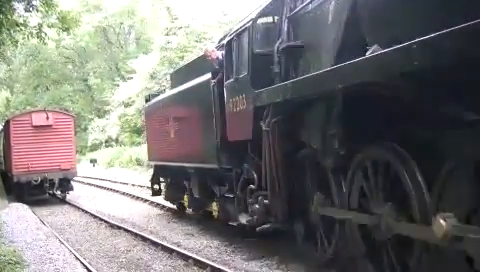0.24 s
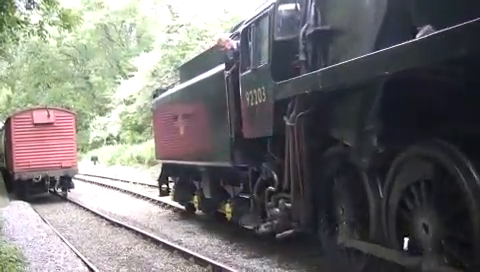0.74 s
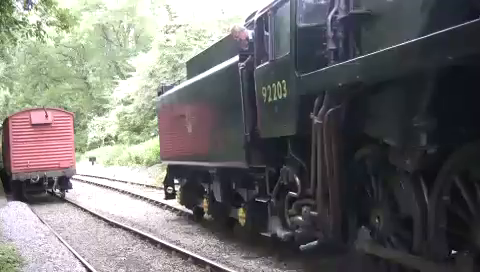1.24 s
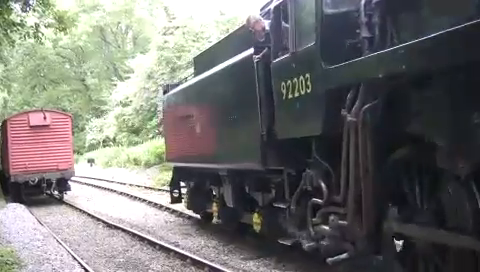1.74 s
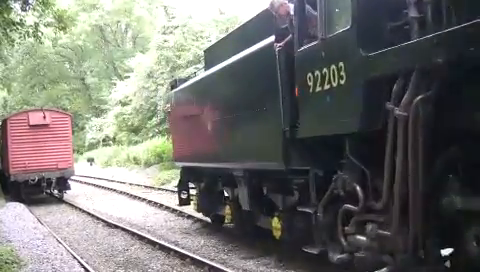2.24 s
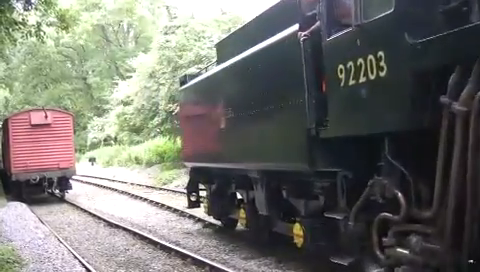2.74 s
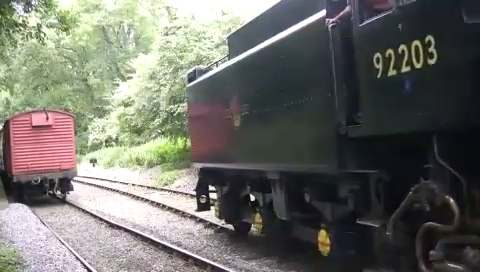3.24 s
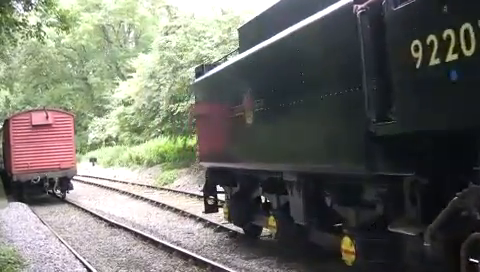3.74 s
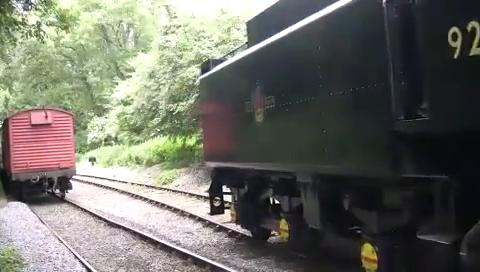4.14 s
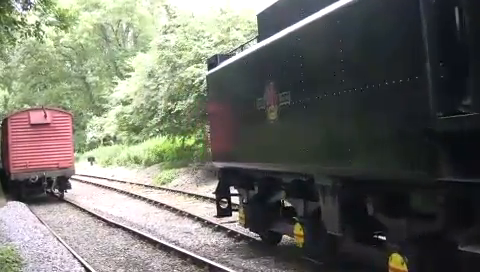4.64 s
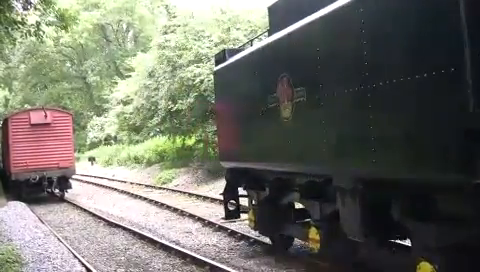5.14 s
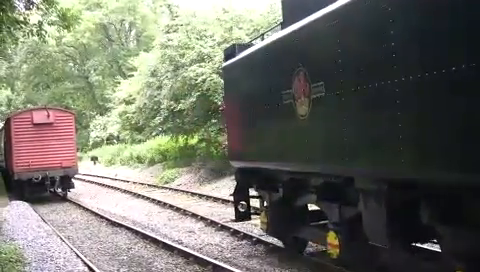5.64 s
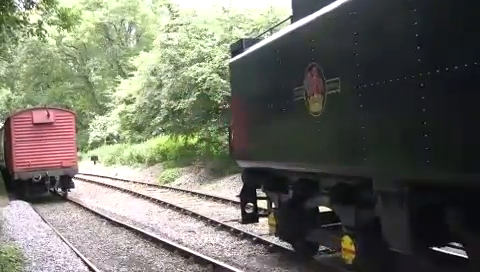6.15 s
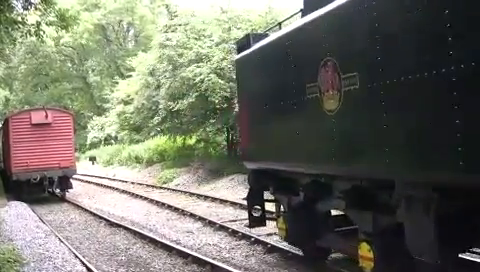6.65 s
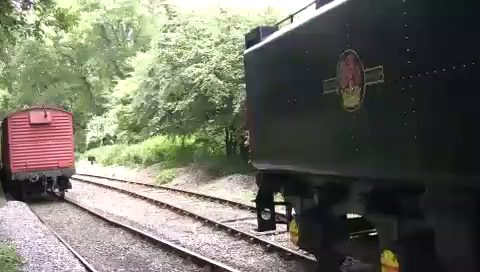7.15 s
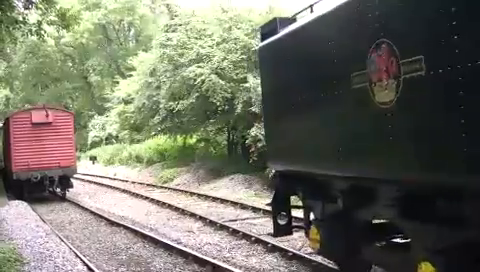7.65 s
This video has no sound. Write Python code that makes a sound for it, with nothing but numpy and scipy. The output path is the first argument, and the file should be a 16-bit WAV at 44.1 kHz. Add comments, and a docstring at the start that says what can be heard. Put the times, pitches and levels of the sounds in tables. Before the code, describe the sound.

Close trackside stereo pickup of a slow heavy engine venting steam. Dense hissing starts at once and shifts in colour, with swelling rumble and low draught on the microphone. After brief faint squeaks, a burst of knocks and stick-slip steel groaning arrives midway. The draught fades, the steam softens but continues, and scattered hollow clanks finish with a faint buffer ring.

```python
"""A steam locomotive rolls slowly past at close range.
From the start a jet of steam hisses under the cab: banded noise that flutters and turns in colour,
over wheel rumble that swells now and then until just past five seconds.
Faint gliding squeaks come first, while the jet's draught builds up as low noise buffeting the microphone.
Midway the drawgear knocks and judders: clicks and stick-slip pulses ring the damped modes of a steel frame.
The draught dies away, the hiss recedes, and the tender clanks as it draws level, its buffer ringing on."""
import sys
import numpy as np
from scipy import signal
from scipy.fft import irfft, next_fast_len
from scipy.io import wavfile
from scipy.ndimage import uniform_filter1d

SR = 44100
rng = np.random.default_rng(int(sys.argv[2]) if len(sys.argv) > 2 else 0)


def transcribe(u):
    """Save the signal u as a 16-bit wav file named by the first command-line argument.

    u: samples, shape (n,) or (channels, n), limited to [-1, 1]; the rate is SR.
    q: integer samples, one column per channel.
    """
    v = np.clip(np.atleast_2d(u).T, -1, 1)
    q = np.round(v * 32767).astype(np.int16)
    wavfile.write(sys.argv[1], SR, q)


N = 347497
TIME = np.arange(N) / SR   # seconds

# The steam jet comes near, then moves away; the jet's gain is added: time_s, level_db
JET_LEVEL = [(0.0, -12), (0.39, -13), (0.53, -14), (0.77, -12.5), (1.12, -13), (1.31, -11.5), (2.63, -13.5),
             (2.9, -11), (3.05, -12.5), (4.91, -14), (6.04, -18), (6.82, -16.5), (7.09, -18), (7.88, -17)]
# The jet's colour as it turns past, against its core: time_s, roar_db, pipe_band_db, top_db
JET_COLOUR = [(0, 3, -.5, 2), (1.35, 1.2, 2, 4), (2.3, 0.2, 0.2, 0), (3.4, -2, -2, -2.5),
              (5.0, -2.5, -2.5, -2), (6.5, 2, 0.3, 1.5), (7.88, 1, 0.5, 0)]
# Centres of the colour zones: core_hz, roar_hz, pipe_band_low_hz, pipe_band_high_hz, top_hz
COLOUR_CENTRES = (7200, 2120, 4170, 5460, 13000)
# The pipe band's lower edge climbs and sinks again, its firmness coming and going:
# time_s, edge_hz, firmness_db
PIPE_EDGE = [(0.3, 3170, 2), (0.9, 3470, 1.8), (1.4, 3600, 3), (2.1, 3700, 0), (2.8, 3580, 1.5),
             (5.5, 3320, 0.7)]
# Steam spectrum: frequency_hz, density_db (per Hz)
STEAM_SPECTRUM = [(50, -54), (400, -18.5), (1000, -13), (2400, -9), (3100, -6), (3900, -3), (5200, 0.7),
                  (5850, -3), (6600, -2), (7100, -1.2), (8700, 0.5), (11500, -2.5), (13500, -5.5),
                  (16000, -10.5)]
# The hiss's top leans right, less so later: time_s, top_left_minus_right_db
TOP_PAN = [(4.9, -3.5), (6.0, -1.5)]
# Draught spectrum: frequency_hz, density_db (per Hz)
DRAUGHT_SPECTRUM = [(20, -40), (50, -27), (80, -23), (120, -3.5), (180, -4.5), (300, 5.5), (450, 0),
                    (700, 1.5), (1000, -1.5), (2000, -9.5), (4000, -47)]

# Drawgear knocks and their rebounds; the last three stand against the body:
# start_s, body_db, clack_db, frame_ring_db, crack_db
KNOCKS = [(3.286, -20, -11, -14, -18), (3.342, -18, -14, -19, -20), (3.365, -22, -11, -18, -18),
          (3.447, -19, -7, -15, -6), (3.498, -24.5, -3, -10, -17), (3.550, -25, -5, -14, -3),
          (3.597, -29, -3, -14, -12), (3.630, -23.5, -1, -8, -12), (3.703, -26, -3, 8.5, -8),
          (3.751, -28, -8, -3, -12), (4.146, -22.5, -24, -20, -14), (4.167, -28, -6, -18, -14),
          (4.193, -29, -12, -14, -16), (6.174, -27.5, -1.5, -15, 0), (6.192, -29, -6, -15, -6),
          (6.251, -37.5, 5, -13, 6), (6.283, -30, -12, -4, -12), (6.542, -24, -9, -16, -6),
          (6.565, -28, -6, -14, 5), (6.619, -25, -9, -11, -4), (6.643, -31, -10, -10, -10),
          (6.681, -22, -16, -10, -20), (6.700, -26, -13, 1, -6), (6.732, -28, -10, -10, -9),
          (6.79, -24.5, -23, 2, -16), (6.996, -19.5, -5.5, -27, -5), (7.061, -22, -9, -19, -12),
          (7.086, -24.5, -6, -19, -8), (7.149, -26.5, -6, -22, -11), (7.172, -28, -5, -16, -13),
          (7.551, -21, -5.5, -8, -11), (7.575, -25, -5, -15, -10), (7.628, -25, -9, 0, -13),
          (7.706, -26, -10, -1, -15)]
# The buffer is touched and rings on: start_s, level_db
BUFFER_HITS = [(6.996, -37), (7.086, -33), (7.551, -39)]
# Stick-slip judder of the loaded drawgear; the last two stand against the body:
# time_s, level_db, slips_per_s, clack_db, ring_db
JUDDER = [(3.29, -26.5, 45, -13, -6), (3.41, -25, 45, -10, -3), (3.49, -26, 50, -6, -7),
          (3.579, -18.5, 80, -10, 0), (3.66, -23, 89, 1, -3), (3.731, -18.5, 110, 1, 3),
          (3.77, -21.5, 95, -1, 4), (3.81, -25, 75, -4, -5), (3.88, -19.5, 70, -6, -1),
          (3.92, -21, 62, -8, -10), (3.97, -24, 60, -8, -16), (4.001, -37, 50, -8, -14)]
# Damped modes of the tender's frame: pitch_hz, level_db, t60_s
FRAME_MODES = [(157.6, -8.5, 0.088), (243.4, 4.5, 0.091), (290.4, -3.5, 0.1), (354, 7.5, 0.031),
               (440, 0.5, 0.079), (500, 6.5, 0.026), (549, 1, 0.033), (643, 3.5, 0.023), (741, -3, 0.041),
               (802, 0, 0.018), (1120, -10, 0.027), (1240, -9.5, 0.025)]
# Borders of boom, body and clack: low_hz, high_hz
REGISTERS = [(120, 280), (280, 580), (580, 1300)]
# Lasting rings, frame first and buffer second: pitch_hz, t60_s
LASTING_RINGS = [(441, 0.29), (937, 0.85)]
# Faint squeaks of the motion: start_s, length_s, start_hz, end_hz, level_db
SQUEAKS = [(0.163, 0.062, 1554, 1400, -24), (0.396, 0.069, 1780, 1505, -23),
           (0.528, 0.085, 1450, 1560, -27)]

# Rolling gear and fire, before the swells: time_s, level_db
ROLLING_LEVEL = [(0, -38.5), (0.7, -33.5), (1.35, -38.5), (2.0, -36), (3.1, -36), (4.2, -34), (4.5, -34.5),
                 (5.6, -34.7), (6.5, -36), (7.88, -36.5)]
# Rumble spectrum: frequency_hz, density_db (per Hz)
RUMBLE_SPECTRUM = [(20, -38), (45, -28), (75, -14), (110, -10), (160, 0.5), (240, 1), (450, -2.5),
                   (650, -9), (1000, -26), (2000, -21)]
# The rumble swells as rods and wheels load the rails: centre_s, half_length_s, rise_db
SWELLS = [(0.384, 0.24, 3.5), (0.95, 0.22, 6.5), (1.63, 0.11, 9), (2.246, 0.15, 6), (2.527, 0.17, 5.5),
          (2.878, 0.049, 5), (4.892, 0.1, 7), (5.223, 0.028, 7)]

# Likeness of left and right noise: frequency_hz, likeness (0-1)
LIKENESS = [(30, 0.49), (120, 1), (270, 1), (600, 1), (1200, 0.88), (2600, 0.98), (3600, 1), (5000, 0.64),
            (5750, 0.28), (6200, 0.77), (6700, 0.45), (7050, 0.99), (16000, 0.99)]
# Balance of left and right noise: frequency_hz, left_minus_right_db
STEREO_BALANCE = [(100, 0.5), (300, 0.5), (700, -0.5), (1100, -1), (2500, -0.5), (3700, 0), (5250, 3.5),
                  (6000, -0.5), (7200, 0), (16000, 0.5)]
# Phase between left and right: frequency_hz, left_lead_rad
STEREO_PHASE = [(100, 0.0025), (1000, -0.42), (2700, -0.15), (3500, -0.89), (4300, -0.098), (5000, -1.15),
                (5400, -1.53), (5750, -1.4), (6200, -1.3), (6700, -1.45), (7000, 0), (16000, 0)]

# The draught builds up, holds until the jet has passed, then dies away
DRAUGHT_DB, DRAUGHT_RISE_DB_PER_S, DRAUGHT_FULL_S = -33, 4.5, 0.94
DRAUGHT_ENDS_S, DRAUGHT_FADE_DB_PER_S = 4.15, 11.5
BOOM_DB = -5   # a knock's boom against its body
THUD_HZ, THUD_T60_S, THUD_DB = 98, 0.15, -18   # the tender rocks on its springs; against the body
DRAWBAR_HZ, DRAWBAR_T60_S, DRAWBAR_DB = 508, 0.15, -2.5   # in the judder; against the frame's ring
# The judder's boom at its start, against the body; it thins as the drawgear tightens
JUDDER_BOOM_DB, BOOM_FADE_DB_PER_S = 1, 16
CUTOFF_HZ = 15900


def from_db(db):
    """Decibels to gain."""
    return 10 ** (np.asarray(db) / 20)


def rms_one(x):
    """Scale to rms 1."""
    return x / np.sqrt(np.mean(x ** 2) + 1e-20)


def in_time(rows):
    """Each column of a time curve, read at every sample."""
    s, *columns = np.transpose(rows)
    return [np.interp(TIME, s, column) for column in columns]


def at_hz(points, hz):
    """Read a curve on a log-frequency axis."""
    f, value = np.transpose(sorted(points))
    return np.interp(np.log(hz), np.log(f), value)


def drift(rate_hz):
    """Slow random wander of spread 1: noise through two equal low-pass poles, computed every 40 samples."""
    r = np.exp(-2 * np.pi * rate_hz * 40 / SR)
    noise = rng.standard_normal(N // 40 + 2002)
    slow = signal.lfilter([1], [1, -2 * r, r * r], noise)[2000:]   # drop the filter's start-up
    return np.interp(np.arange(N) / 40, np.arange(len(slow)), rms_one(slow))


def ring(force, hz, t60_s):
    """A damped resonance: a unit click sets a sine of height 1 ringing."""
    r = np.exp(-np.log(1000) / (t60_s * SR))
    w = 2 * np.pi * hz / SR
    return signal.lfilter([0, np.sin(w)], [1, -2 * r * np.cos(w), r * r], force + 1e-18)


def noise_bands(spectrum, low_hz, high_hz, count, likeness=LIKENESS):
    """Stereo noise with set likeness, balance and phase, in overlapping bands: yields (centre Hz, band)."""
    size = next_fast_len(N, real=True)
    hz = np.maximum(np.arange(size // 2 + 1) * SR / size, 1)
    mid, side = rng.standard_normal((2, len(hz))) + 1j * rng.standard_normal((2, len(hz)))
    alike = np.clip(at_hz(likeness, hz), 0, 1)
    sides = np.array([[1], [-1]])   # left, right
    balance = from_db(sides * at_hz(STEREO_BALANCE, hz) / 2)
    phase = np.exp(.5j * sides * at_hz(STEREO_PHASE, hz))
    noise = np.sqrt(1 + alike) * mid + sides * np.sqrt(1 - alike) * side
    noise = noise * balance * phase * from_db(at_hz(spectrum, hz))
    centres = np.geomspace(low_hz, high_hz, count)
    for centre, share in zip(centres, np.eye(count)):
        band = noise * np.interp(np.log(hz), np.log(centres), share)
        yield centre, irfft(band.astype(np.complex64), size)[:, :N]


def steam(gain_db=1., flutter_db=0.47, patchy_db=0.94, pipe_patchy_db=1.48, flutter_hz=16, patchy_hz=14,
          pan_range_hz=(7500, 10500), edge_octaves=0.12):
    """Turbulent jet: flutters as a whole and in patches, most in the pipe band, and turns in colour."""
    level_db, = in_time(JET_LEVEL)
    roar_db, pipe_db, top_db = in_time(JET_COLOUR)
    edge_hz, edge_db = in_time(PIPE_EDGE)
    pan_db, = in_time(TOP_PAN)
    zones = np.eye(len(COLOUR_CENTRES))[1:]   # the core stays uncoloured
    out = 0
    for hz, band in noise_bands(STEAM_SPECTRUM, 1530, 12920, count=27):
        roar, pipe_low, pipe_high, top = (at_hz(list(zip(COLOUR_CENTRES, zone)), hz) for zone in zones)
        pipe = pipe_low + pipe_high
        # a hollow just below the pipe band's edge, a ridge just above it
        above = np.log2(hz / edge_hz) / edge_octaves
        ridge_db = edge_db * above * np.exp((1 - above ** 2) / 2)
        colour_db = roar * roar_db + pipe * pipe_db + top * top_db + ridge_db
        patch_db = (pipe * pipe_patchy_db + (1 - pipe) * patchy_db) * drift(patchy_hz)
        # only the top of the hiss is panned
        pan = from_db(np.interp(hz, pan_range_hz, [0, 1]) * pan_db / 2)
        out = out + band * np.array([pan, 1 / pan]) * from_db(colour_db + patch_db)
    # level out half-second swings, so the level curve alone sets them
    steady = out / np.sqrt(uniform_filter1d(np.mean(out ** 2, axis=0), size=SR // 2))
    return steady * from_db(level_db + gain_db + flutter_db * drift(flutter_hz))


def draught(gusty_db=3, gust_hz=12):
    """Eddies of moving air buffet left and right with unrelated noise; no gust stands far out."""
    before_s = np.maximum(DRAUGHT_FULL_S - TIME, 0)
    after_s = np.maximum(TIME - DRAUGHT_ENDS_S, 0)
    level_db = DRAUGHT_DB - DRAUGHT_RISE_DB_PER_S * before_s - DRAUGHT_FADE_DB_PER_S * after_s
    out = 0
    for _, band in noise_bands(DRAUGHT_SPECTRUM, 86, 800, count=3, likeness=[(1, 0)]):
        out = out + band * from_db(gusty_db * np.tanh(drift(gust_hz)))
    return rms_one(out) * from_db(level_db)


def frame(force, low_hz, high_hz, scatter_db=5.0, detune=0.0097):
    """The frame's damped modes in one register; strength and pitch of each vary with the contact."""
    strengths, shifts = rng.standard_normal((2, len(FRAME_MODES)))
    modes = 0
    for k, (hz, db, t60_s) in enumerate(FRAME_MODES):
        if low_hz < hz < high_hz:
            mode = ring(force, hz * (1 + detune * shifts[k]), t60_s)
            modes = modes + (-1) ** k * mode * from_db(db + scatter_db * strengths[k])
    return signal.sosfilt(signal.butter(1, [low_hz, high_hz], "band", fs=SR, output="sos"), modes)


def knocks(rattle_db=-34, rattle_follows=0.42, rattle_s=0.059, crack_s=0.014, crack_hz=(900, 2100)):
    """Slack is taken up: a blow rings the frame with a crack of steel; stronger clacks rattle more."""
    t = np.arange(SR // 4) / SR
    attack = t < .018
    click = (t == 0) * 1.
    crack_band = signal.butter(2, crack_hz, "band", fs=SR, output="sos")
    out = np.zeros(N + len(t))
    for s, body_db, clack_db, _, crack_db in KNOCKS:
        rattle = rng.standard_normal(len(t)) * np.exp(-t / rattle_s)
        force = click + from_db(rattle_db + rattle_follows * clack_db) * rattle
        crack = rms_one(signal.sosfilt(crack_band, rng.standard_normal(len(t))))
        knock = from_db(crack_db) * crack * np.exp(-t / crack_s)
        knock = knock + from_db(THUD_DB) * ring(force, THUD_HZ, THUD_T60_S)
        for db, (low_hz, high_hz) in zip((BOOM_DB, 0, clack_db), REGISTERS):
            part = frame(force, low_hz, high_hz)
            # each register is scaled by its level during the attack
            knock = knock + from_db(db) * part / np.std(part[attack])
        at = round(s * SR)
        out[at:at + len(t)] += from_db(body_db) * knock
    return out[:N]


def ringing(waver=0.01105, waver_hz=25.6):
    """Blows add energy to lightly damped rings of frame and buffer, which waver in pitch as they drain."""
    frame_hits = [(s, body_db + ring_db) for s, body_db, _, ring_db, _ in KNOCKS]
    out = np.zeros(N)
    for (hz, t60_s), hits in zip(LASTING_RINGS, (frame_hits, BUFFER_HITS)):
        s, db = np.transpose(hits)
        fed = np.zeros(N)
        fed[np.round(s * SR).astype(int)] = from_db(db) ** 2
        kept = np.exp(-2 * np.log(1000) / (t60_s * SR))   # share of energy left after one sample
        energy = uniform_filter1d(signal.lfilter([1], [1, -kept], fed + 1e-18), size=128)
        turns = np.cumsum(hz * (1 + waver * drift(waver_hz))) / SR
        out += np.sqrt(2 * np.abs(energy)) * np.sin(2 * np.pi * turns)
    return out


def judder(uneven=0.32, sway_db=2, sway_hz=9, grit_db=-34, scatter_db=4.6, soft_hz=950, slip_spread_db=2.2):
    """The drawgear sticks and slips unevenly; under load the slips crowd into a gritty, brighter rasp."""
    level_db, slips_per_s, clack_db, ring_db = in_time(JUDDER)
    start_s, end_s = JUDDER[0][0], JUDDER[-1][0]
    loaded_s = np.clip(TIME, start_s, end_s) - start_s
    # one click each time the running count of slips passes a whole number
    count = np.cumsum(slips_per_s * np.exp(uneven * drift(39.1))) / SR
    slips = np.diff(np.floor(count), prepend=0) * from_db(slip_spread_db * drift(32))
    force = slips + from_db(grit_db) * rng.standard_normal(N)
    force = signal.sosfilt(signal.butter(4, soft_hz, fs=SR, output="sos"), force)
    boom, body, clack = (frame(force, low_hz, high_hz, scatter_db) for low_hz, high_hz in REGISTERS)
    # the rings of frame and drawbar come and go in turn
    sway = from_db(sway_db * drift(sway_hz))
    frame_ring = rms_one(ring(force, *LASTING_RINGS[0])) * sway
    drawbar_ring = from_db(DRAWBAR_DB) * rms_one(ring(force, DRAWBAR_HZ, DRAWBAR_T60_S)) / sway
    out = rms_one(body) + from_db(ring_db) * (frame_ring + drawbar_ring)
    out = out + from_db(JUDDER_BOOM_DB - BOOM_FADE_DB_PER_S * loaded_s) * rms_one(boom)
    out = out + from_db(clack_db) * rms_one(clack)
    # level out over 40 ms, so the level curve shapes the judder
    steady = out / np.sqrt(uniform_filter1d(out ** 2, size=SR // 25) + 1e-12)
    return steady * from_db(level_db) * (TIME > start_s) * (TIME < end_s)


def squeaks(waver=0.0286, waver_hz=82, broken=0.38, catch_hz=60):
    """Dry bearings give short, wavering glides that keep catching and breaking off."""
    out = np.zeros(N)
    wobble = 1 + waver * drift(waver_hz)
    grip = np.clip(1 + broken * drift(catch_hz), 0, 1.4)
    for s, length_s, start_hz, end_hz, db in SQUEAKS:
        along = np.clip((TIME - s) / length_s, 0, 1)
        hz = (start_hz + (end_hz - start_hz) * along) * wobble
        out += from_db(db) * np.sin(np.pi * along) * np.sin(2 * np.pi * np.cumsum(hz) / SR)
    return out * grip


def rumble(lumpy_db=2.7, deep_lumpy_db=8, lumpy_hz=12, jolt_hz=5):
    """Heavy wheels on the rails: low noise that swells with the rods, lumpiest in the deep bass."""
    level_db, = in_time(ROLLING_LEVEL)
    swell_db = sum(db * np.exp(-((TIME - s) / half_s) ** 2) for s, half_s, db in SWELLS)
    jolts = np.minimum(drift(jolt_hz), 1)
    out = 0
    for hz, band in noise_bands(RUMBLE_SPECTRUM, 54, 750, count=4):
        depth = np.interp(hz, [70, 150], [1, 0])
        out = out + band * from_db(lumpy_db * drift(lumpy_hz) + depth * deep_lumpy_db * jolts)
    return rms_one(out) * from_db(level_db + swell_db)


def lineside(x, echo_db=-21):
    """Early dull echoes from the ballast and the tender's side, six each left and right, own delays."""
    dull = signal.sosfilt(signal.butter(1, 2000, fs=SR, output="sos"), x)
    lags = (rng.uniform(.001, .016, (2, 6)) * SR).astype(int)
    echoes = np.array([sum(np.pad(dull, (lag, 0))[:N] for lag in channel) for channel in lags])
    return x + from_db(echo_db) * echoes


def scene(gear_pan_db=0.1, gear_low_hz=75):
    """Steam, its draught and the rumble, with the metal noises of the running gear."""
    metal = knocks() + ringing() + judder() + squeaks()
    # the steelwork radiates little deep bass
    metal = signal.sosfilt(signal.butter(2, gear_low_hz, "high", fs=SR, output="sos"), metal)
    gear = lineside(metal) * from_db([[gear_pan_db], [-gear_pan_db]])
    return steam() + draught() + gear + rumble()


def record(dry):
    """Clip any peaks at full scale, then cut the top steeply."""
    top_cut = signal.ellip(12, .1, 80, CUTOFF_HZ, fs=SR, output="sos")
    return signal.sosfilt(top_cut, np.clip(dry, -1, 1))


dry = scene()
out = record(dry)
transcribe(out)
```